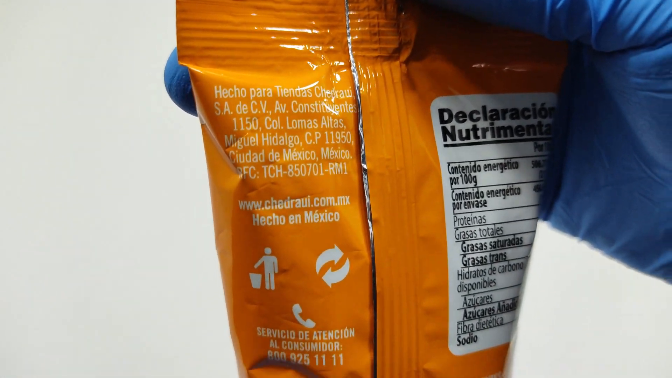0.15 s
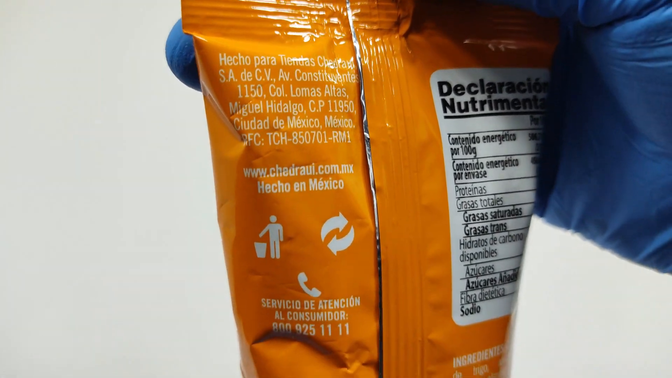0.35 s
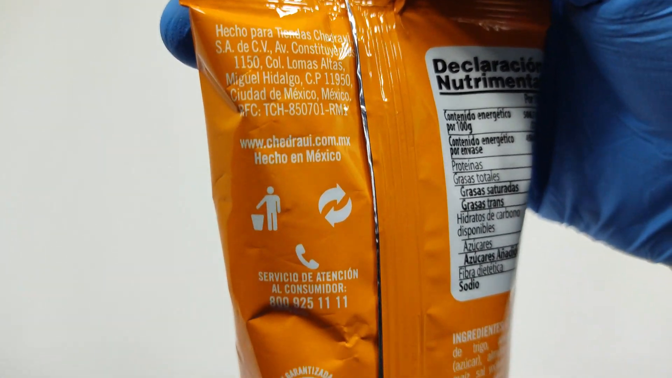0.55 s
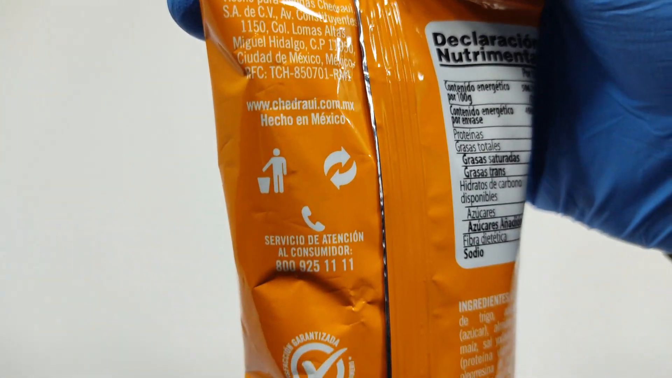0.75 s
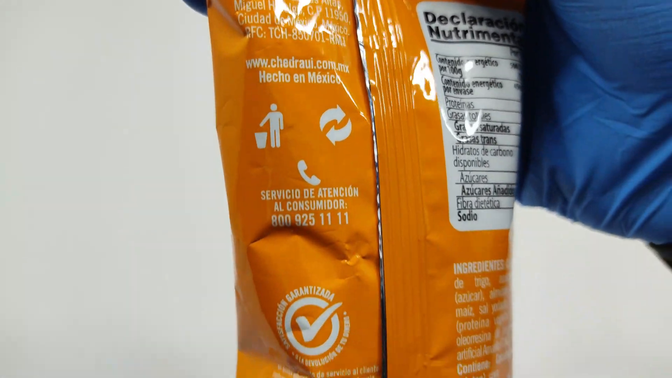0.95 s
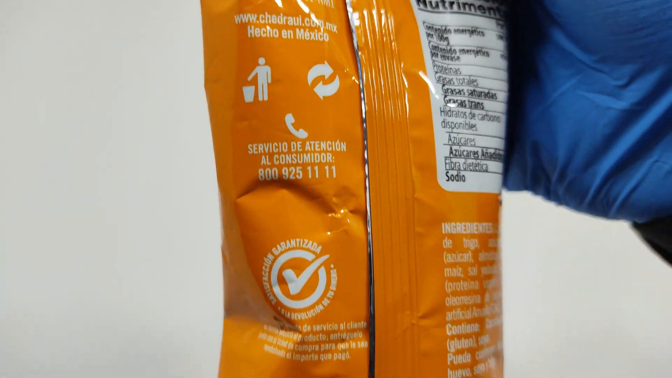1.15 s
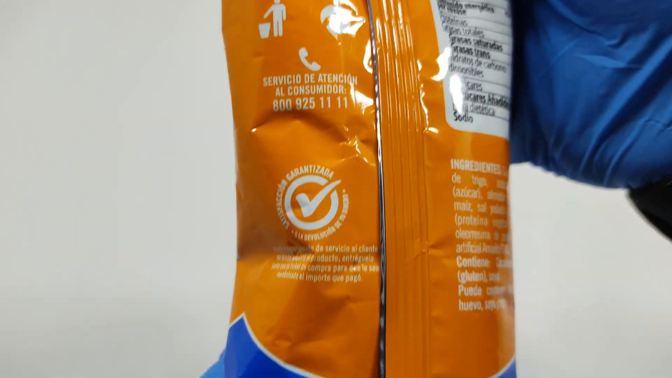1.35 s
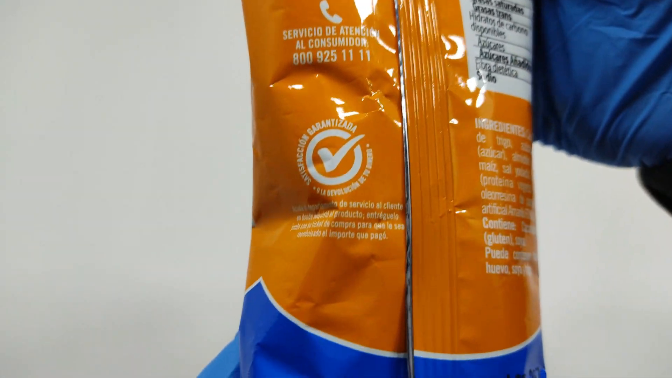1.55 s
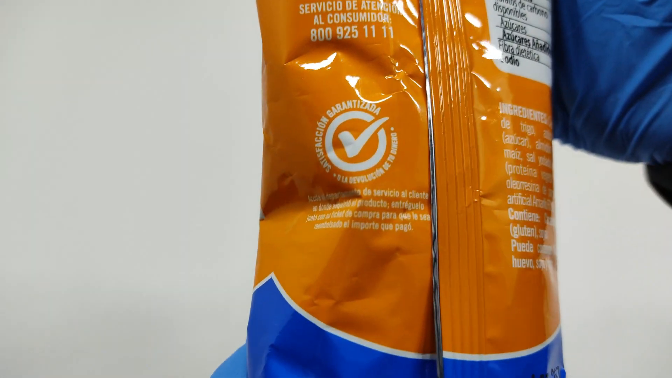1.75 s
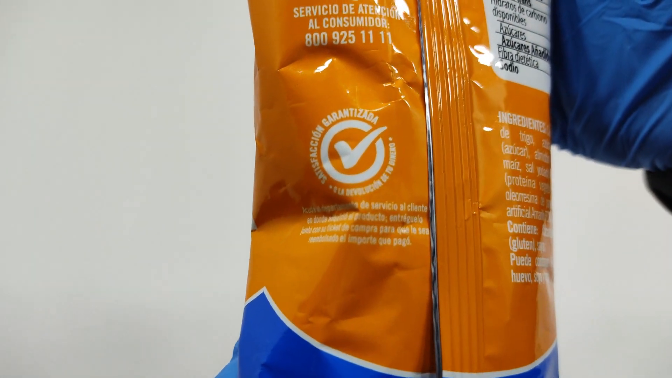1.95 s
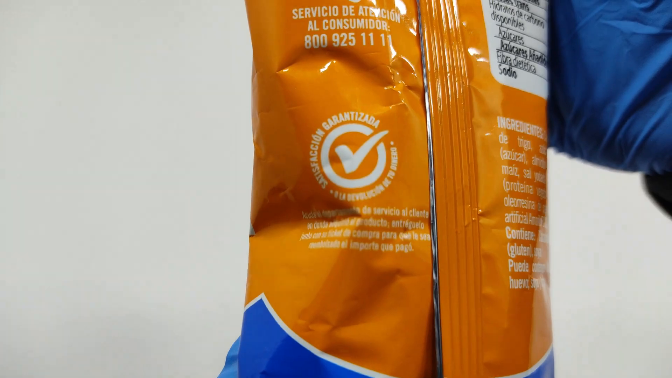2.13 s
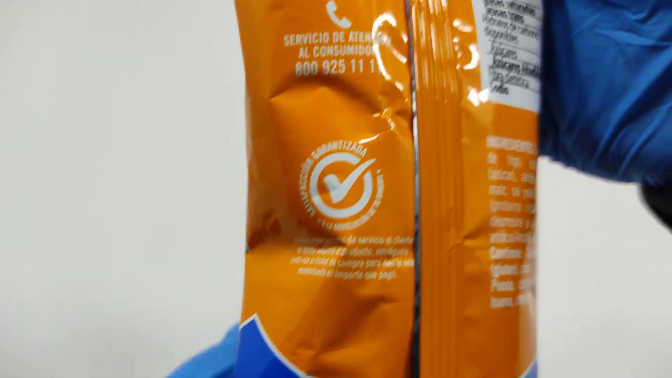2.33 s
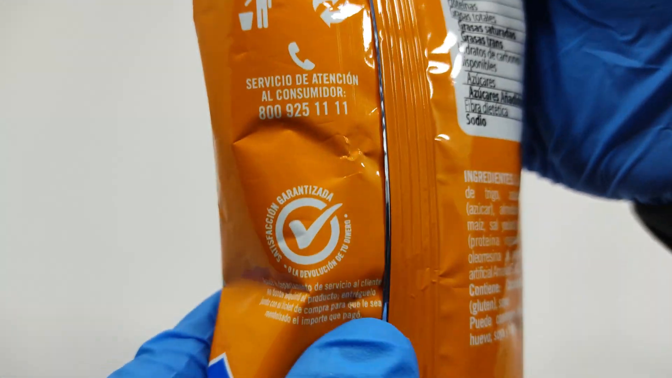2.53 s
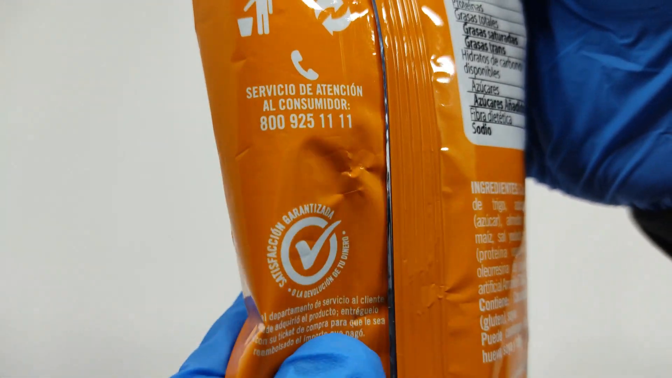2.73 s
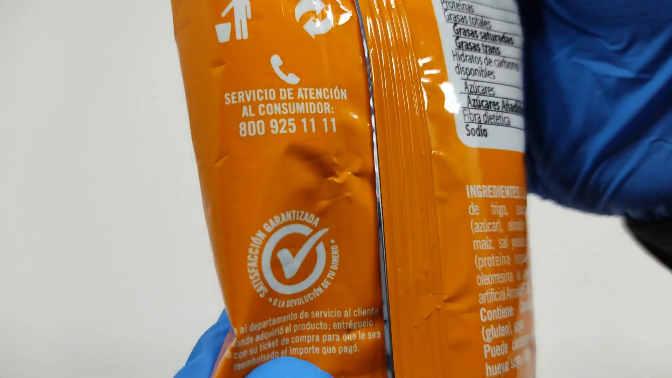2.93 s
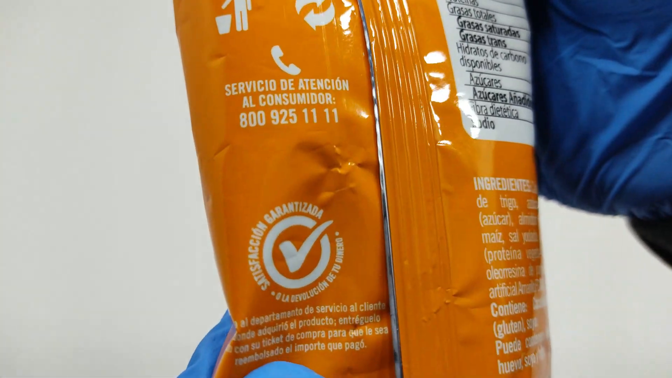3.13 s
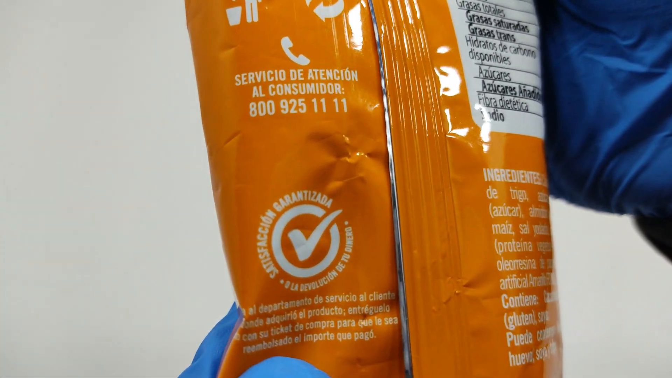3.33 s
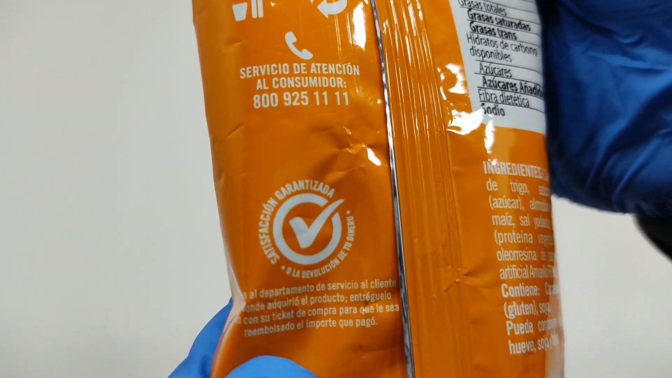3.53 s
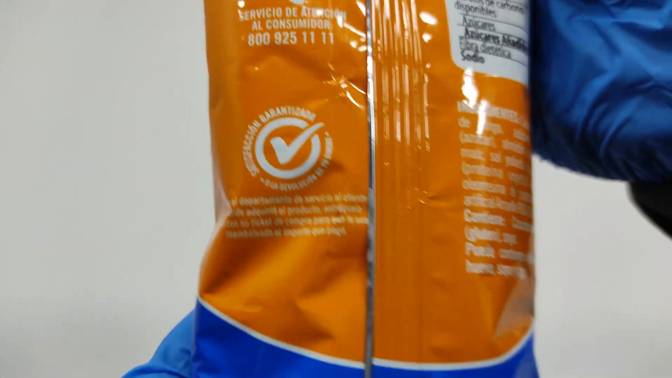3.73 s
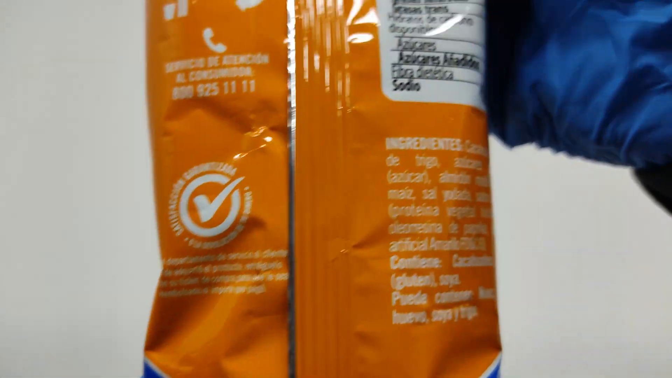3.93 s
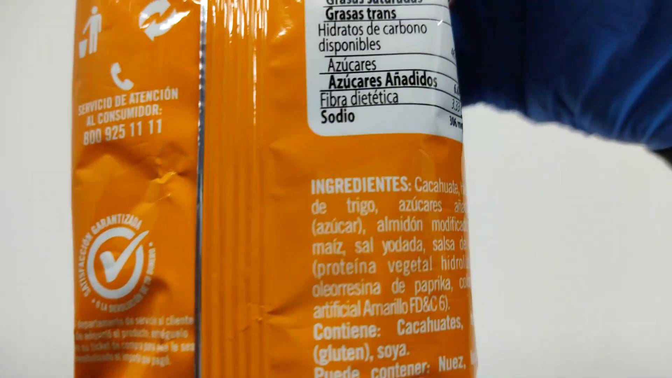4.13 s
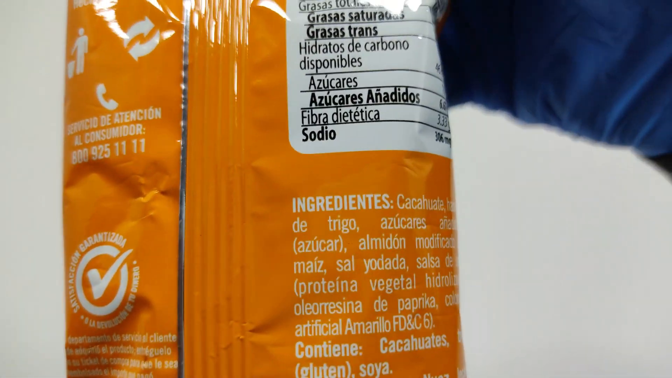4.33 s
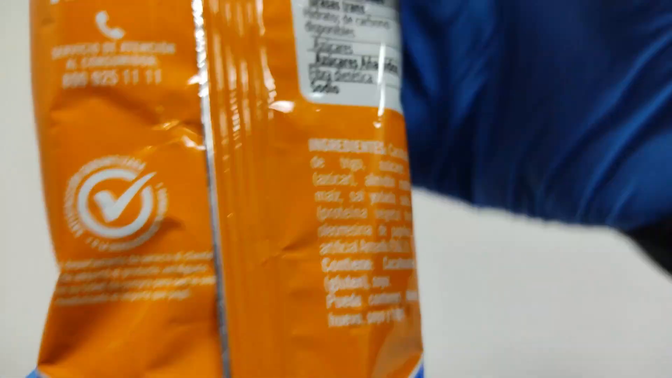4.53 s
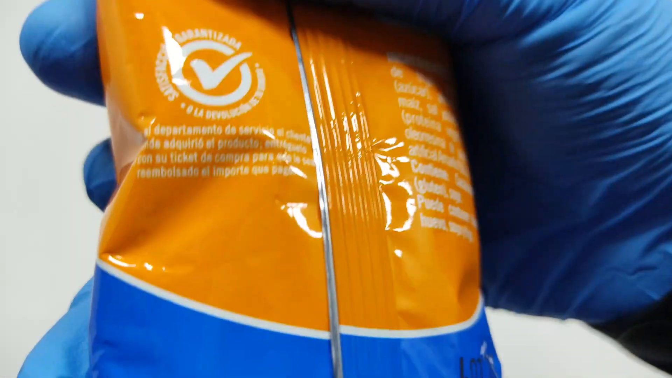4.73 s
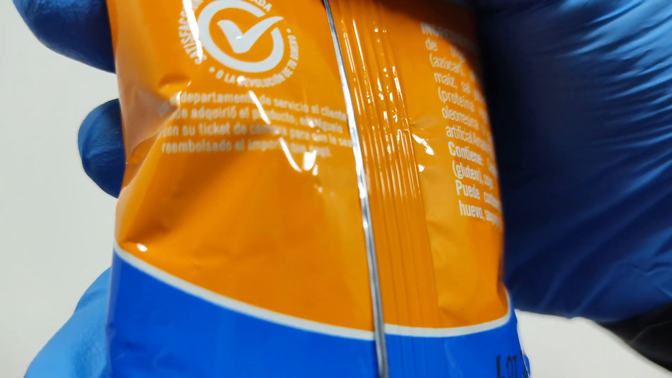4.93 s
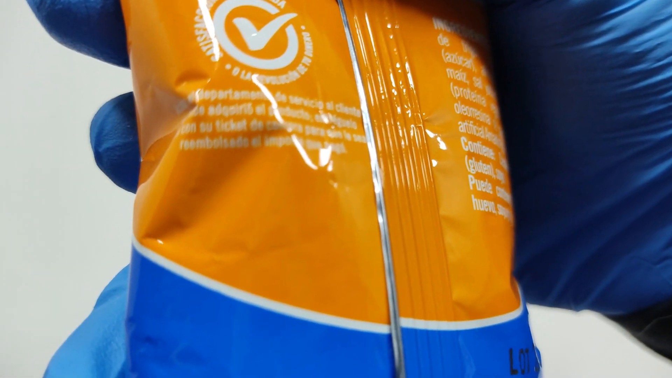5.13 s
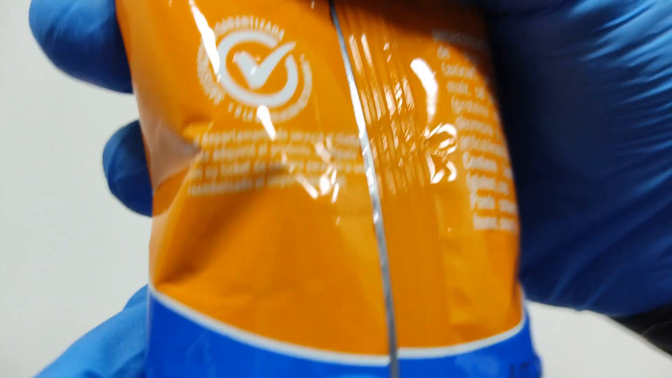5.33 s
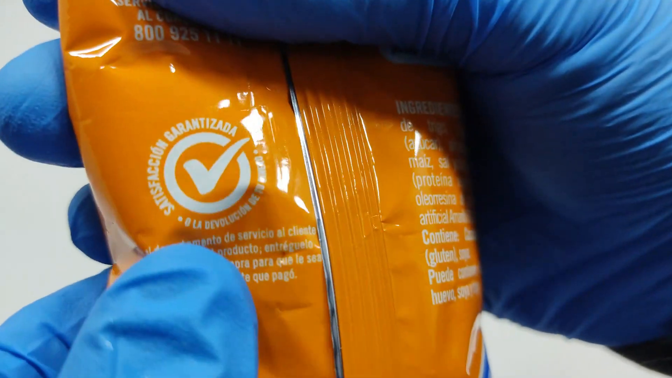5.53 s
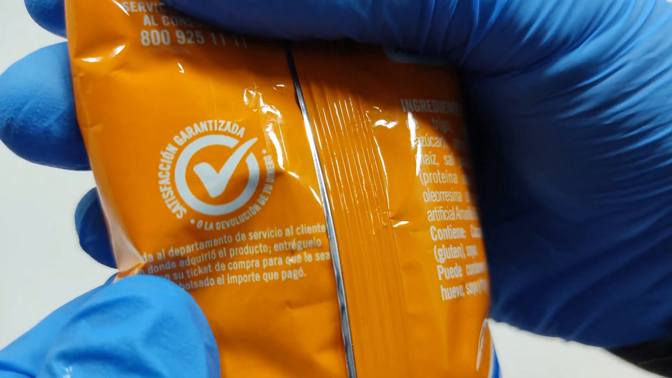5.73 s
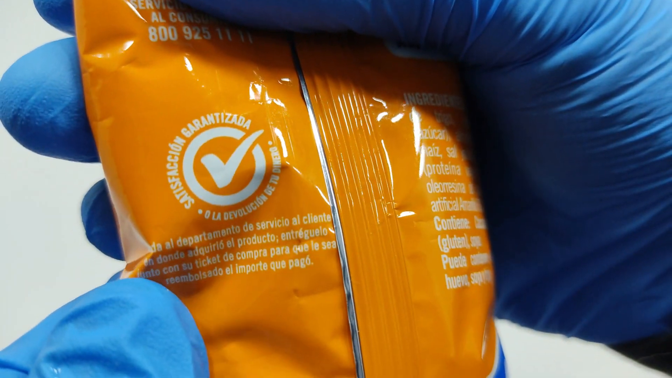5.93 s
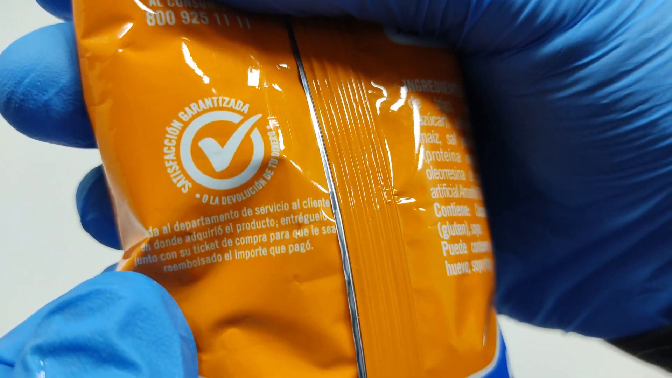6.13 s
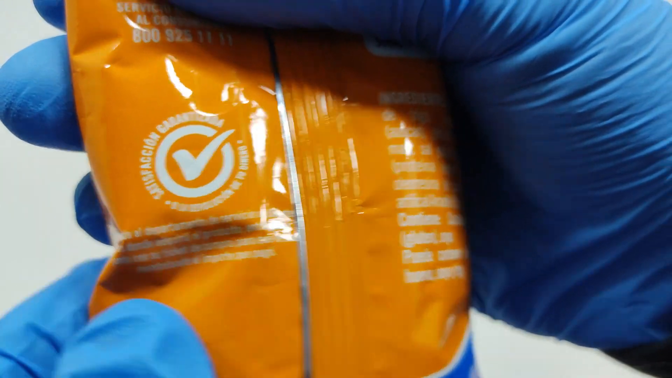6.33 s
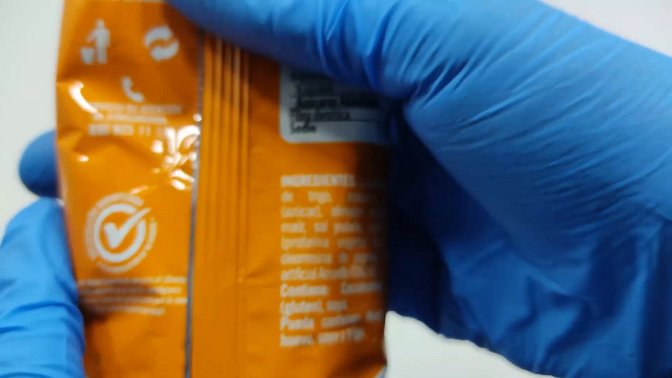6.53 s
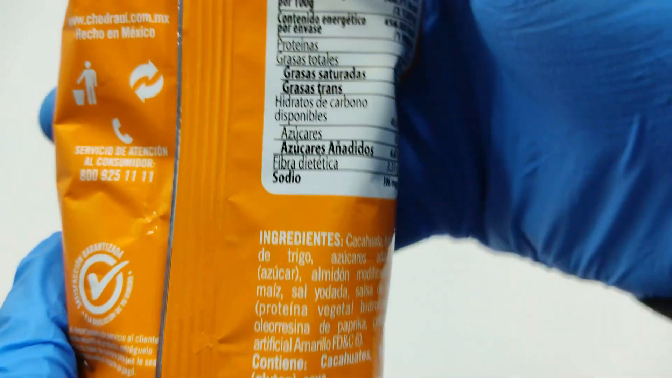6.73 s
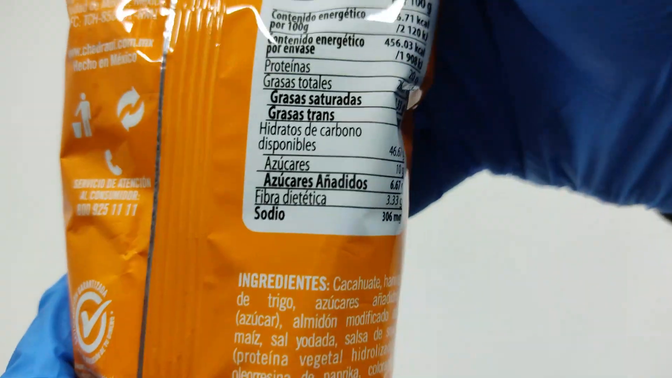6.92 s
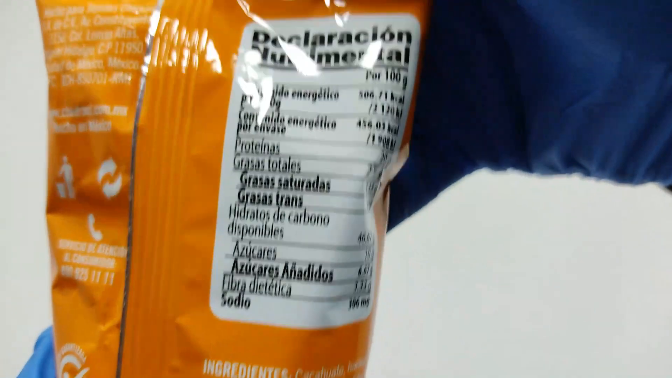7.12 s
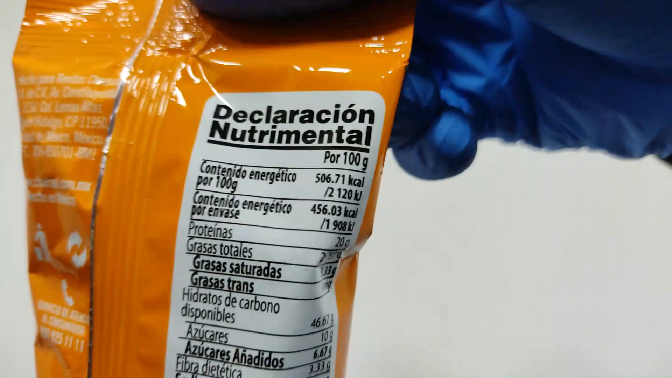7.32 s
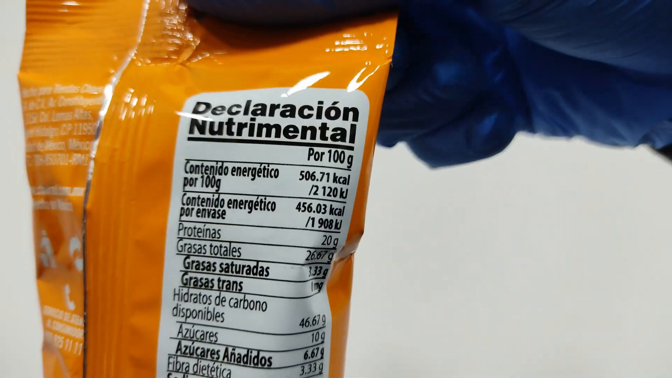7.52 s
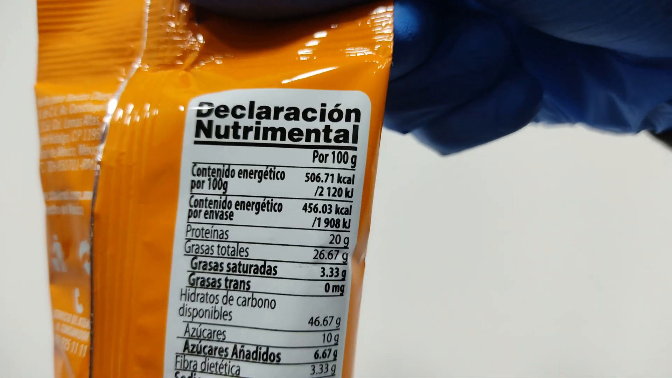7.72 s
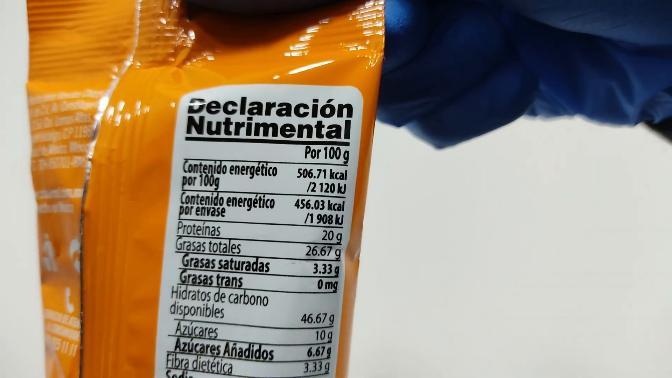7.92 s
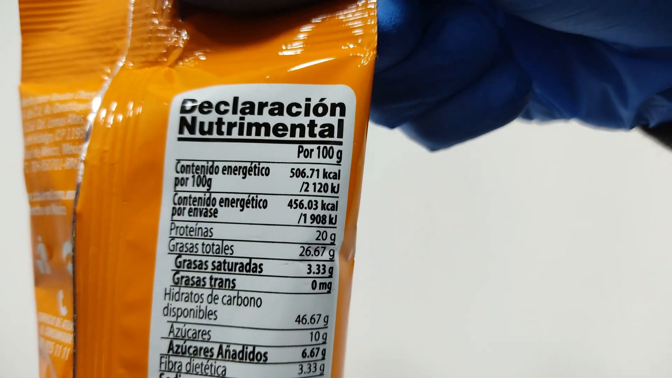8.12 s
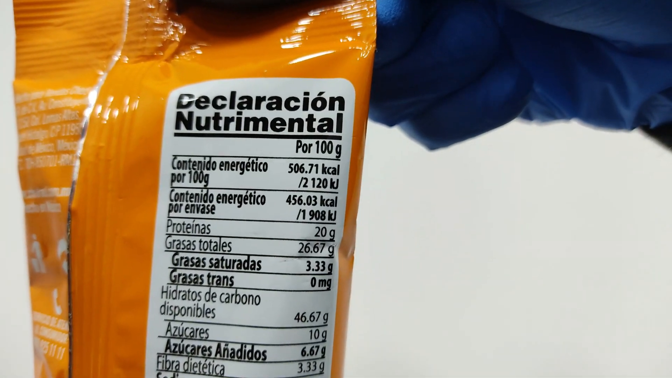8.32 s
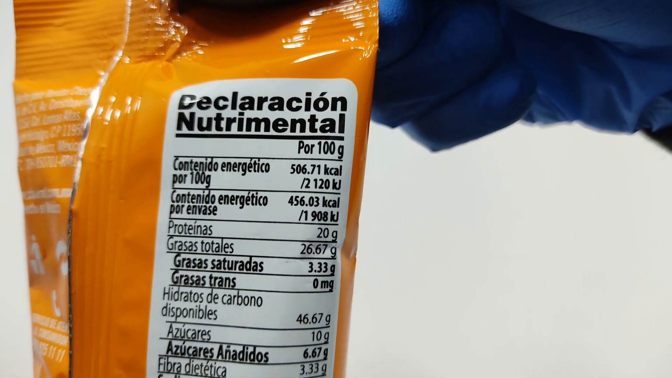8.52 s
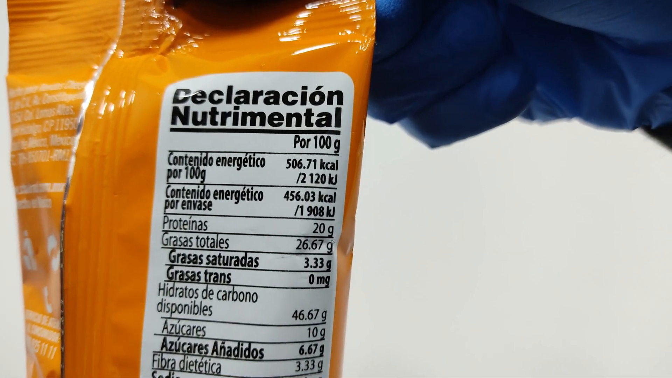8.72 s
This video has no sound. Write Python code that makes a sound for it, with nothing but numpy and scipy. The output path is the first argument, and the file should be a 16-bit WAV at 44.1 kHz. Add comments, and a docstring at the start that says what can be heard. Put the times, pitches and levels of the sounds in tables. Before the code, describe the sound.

A small foil-like snack packet is handled very close: bursts of dry snaps, soft crinkling and glove rub, with short pauses and fading clicks at the end.

```python
"""Snack bag squeezed by gloved hands

Gloved hands squeeze and turn a plastic snack bag close to a stereo microphone in a small room.
Creases buckle in short avalanches of tiny cracks: noise bursts, with a panel that pops and rings briefly.
The belly of the bag caves in with thuds: short tones that fall unsteadily in pitch.
Between the snaps, uneven noise grains and ringing pips make the soft crinkle and the rub of the gloves.
A dull palm rumble, a short room tail, a steady hush and a faint wavering whine lie beneath."""
import sys
import numpy as np
from scipy import signal
from scipy.fft import rfft, irfft, next_fast_len
from scipy.io import wavfile
from scipy.ndimage import uniform_filter1d

SR = 44100
rng = np.random.default_rng(int(sys.argv[2]) if len(sys.argv) > 2 else 0)


def int16_out(signal):
    """Quantize to a 16-bit WAV file."""
    q = np.round(np.clip(np.atleast_2d(signal).T, -1, 1) * 32767)
    wavfile.write(sys.argv[1], SR, q.astype(np.int16))


N = 386757  # samples


def amp(db):
    """Decibels to gain."""
    return 10 ** (np.asarray(db) / 20)


def unit(x):
    """Each row at rms 1."""
    return x / np.sqrt(np.mean(x ** 2, axis=-1, keepdims=True) + 1e-20)


def along(points, hz):
    """Values at hz from (Hz, value) points joined on a log frequency axis."""
    f, v = np.transpose(points)
    return np.interp(np.log(hz + 1), np.log(f), v)


def colour(points):
    """The frequency response that follows a (Hz, dB) spectrum."""
    return lambda hz: amp(along(points, hz))


def filtered(x, response):
    """x shaped by a response of frequency."""
    n = x.shape[-1]
    m = next_fast_len(n + n // 16, real=True)  # padded against wrap-around
    spectrum = rfft(x, m) * response(np.fft.rfftfreq(m, 1 / SR))
    return irfft(spectrum, m)[..., :n]


def wobble(rate):
    """A random curve with rate knots a second."""
    knots = rng.standard_normal(N // 32)
    return np.interp(np.arange(N) * rate / SR, np.arange(len(knots)), knots)


def sides(pan_db):
    """Left and right gains of constant power; positive pan_db leans left."""
    g = amp(np.array([pan_db, -pan_db]) / 2)
    return g / np.sqrt(np.mean(g ** 2, axis=0))


def placed(times, bursts):
    """Stereo bursts laid on the time line, each centred on its time."""
    size = bursts.shape[-1]
    where = np.round(times * SR).astype(int)[:, None] + np.arange(size) + size // 2
    return np.array([np.bincount(where.ravel(), b.ravel(), N + size)[size:N + size] for b in bursts])


def air():
    """The steady hush of the room, as coloured noise, and a faint whine that wavers in level."""
    # spectrum of the still room air: hz, relative level_db (per Hz)
    quiet = [(25, 2), (60, -9.5), (150, -13.5), (400, -16.5), (700, -41), (2000, -38), (5000, -45),
             (15000, -54)]
    whine_hz, whine_db = 1860, -90  # the level wavers around this
    whine_gain = amp(whine_db + 2 * wobble(18))
    whine = whine_gain * np.sin(2 * np.pi * whine_hz * np.arange(N) / SR)
    hush = unit(filtered(rng.standard_normal((2, N)), colour(quiet)))
    return amp(-71.5) * hush + whine


def room(x, wet_db, build, cross):
    """Near walls return a short dense tail that builds over build seconds, coloured by room resonances."""
    # decay time of the tail: hz, t60_s
    room_t60 = [(150, 0.24), (500, 0.13), (1800, 0.14), (8000, 0.15), (15000, 0.15)]
    # resonances that colour the tail: centre_hz, width_hz, boost_db
    room_modes = [(290, 35, 2), (564, 30, 5), (700, 60, 6), (920, 90, 2), (1170, 80, 2), (1800, 90, 5)]
    hz, t, z = signal.stft(rng.standard_normal((2, SR // 3)), SR, nperseg=256)
    decay = amp(-60 * t / along(room_t60, hz)[:, None])
    tail = signal.istft(z * decay, SR, nperseg=256)[1]
    tail *= 1 - np.exp(-(np.arange(tail.shape[1]) / SR / build) ** 2)
    tail = unit(tail) / np.sqrt(tail.shape[1])
    mixed = x + cross * x[::-1]  # each side hears reflections of the whole bag
    wet = signal.fftconvolve(mixed, tail, axes=1)[:, :N]

    def peaks(f):
        """Summed resonance boosts in dB."""
        return sum(db / (1 + (2 * (f - centre) / width) ** 2) for centre, width, db in room_modes)

    return filtered(wet, lambda f: amp(along(wet_db, f) + peaks(f)))


def effort(t):
    """Levels of rub, crinkle and drag in dB: the fingers grab, press to a peak, ease off and let go."""
    # squeezes, before each layer's own trim:
    # start_s, peak_s, end_s, rub_db, crinkle_db (over the rub), drag_db (over the rub)
    squeezes = [(0.288, .44, 0.7, -42.5, -8.5, -16), (0.869, 0.927, 1.044, -48, -2, -13.5),
                (1.274, 1.323, 1.46, -48.5, 2.5, -14.5), (1.72, 1.895, 2, -40.5, -1.5, -21.5),
                (2.036, 2.16, 2.24, -39, -4.5, -15.5), (2.366, 2.435, 2.56, -34.5, -4, -11.5),
                (2.597, 2.714, 2.93, -27, -9.5, -17.5), (3.0, 3.025, 3.14, -47.5, -16, -13),
                (3.132, 3.425, 3.55, -65, -21, 6), (3.568, 3.758, 3.92, -37.5, -4.5, -16.5),
                (3.931, 4.099, 4.23, -33.5, -6.5, -12), (4.284, 4.373, 4.44, -42, -3, -18.5),
                (4.503, 4.529, 4.68, -46, 0, -9.5), (4.663, 4.787, 4.987, -34, -2.5, -18),
                (5.361, 5.366, 5.456, -33.5, 0, -20.5), (5.486, 5.637, 5.77, -38.5, -1.5, -17.5),
                (6.413, 6.441, 8.3, -48.5, 0.5, -16), (6.509, 6.562, 6.94, -31, -4.5, -11.5),
                (6.908, 6.944, 7.05, -29.5, -11, -20.5), (7.116, 7.267, 7.45, -39.5, 0, -10.5),
                (7.585, 7.657, 7.88, -40, 0.5, -12.5), (7.89, 7.96, 7.95, -51.5, -3.5, -15),
                (8.15, 8.204, 8.2, -54.5, -4, -6.5)]
    # floor while the hands only hold the bag, before the same trims: rub_db, crinkle_db, drag_db
    rest_levels = [-79.5, -85, -81.5]
    ease_db = 7.5  # a squeeze is this much weaker at its ends than at its peak
    grab_db_per_s, release_db_per_s = 798.5, 261.5  # how fast a squeeze sets in and dies away
    start, peak, end, rub_db, crinkle_db, drag_db = np.transpose(squeezes)[..., None]
    slow = t[::64]  # a coarse time grid is enough for hand movement
    before_peak = (peak - slow) / np.maximum(peak - start, .005)
    after_peak = (slow - peak) / np.maximum(end - peak, .005)
    off_peak = np.maximum(before_peak, after_peak)
    force_db = rub_db - ease_db * np.minimum(off_peak, 1)
    force_db = force_db - grab_db_per_s * np.maximum(start - slow, 0)
    force_db = force_db - release_db_per_s * np.maximum(slow - end, 0)
    layers = force_db, force_db + crinkle_db, force_db + drag_db
    # the strongest squeeze at each moment wins
    return [np.interp(t, slow, np.maximum(db.max(axis=0), rest)) for db, rest in zip(layers, rest_levels)]


def drag():
    """A sliding palm stirs the air in the bag into a dull, uneven rumble."""
    # spectrum of the rumble: hz, relative level_db (per Hz)
    drag_spectrum = [(90, -30), (170, -9.5), (280, 1.5), (400, 3.5), (520, -8), (1200, -44.5)]
    *_, level_db = effort(np.arange(N) / SR)
    stir = rng.standard_normal((2, N)) * amp(6.3 * wobble(40))
    return amp(level_db) * unit(filtered(stir, colour(drag_spectrum)))


def folds(hz, count):
    """One random gain curve per fold, with peaks and gaps a few tenths of an octave wide."""
    fold_db = 3.6  # typical depth of the colouring, shallower in the high treble
    place = 5 * np.log2(1 + hz / 400)
    knots = rng.standard_normal((count, int(place.max()) + 2))
    ripple = np.array([np.interp(place, np.arange(len(k)), k) for k in knots])
    return amp(fold_db * ripple * np.interp(hz, [5000, 8000], [1, .3]))


def patchy(x, size=512):
    """Every few milliseconds another small fold takes over and lends its colour."""
    hz, t, z = signal.stft(x, SR, nperseg=size)
    return signal.istft(z * folds(hz, len(t)).T, SR, nperseg=size)[1][:, :N]


def pips(count=3000, size=600, pitch_hz=1000, spread=0.372, cycles=2.6, uneven_db=5.5):
    """Small facets of film flip at random, and each rings for a few cycles at its own pitch."""
    t = np.arange(size) / SR
    start = rng.integers(0, N, count)
    pitch, strength, pan = rng.standard_normal((count, 3)).T
    turns = (pitch_hz * np.exp(spread * pitch))[:, None] * t
    ring = amp(uneven_db * strength)[:, None] * (1 - np.exp(-turns)) * np.exp(-turns / cycles)
    phase = rng.random((2, count, 1))  # the two ports lie at different distances from each facet
    waves = ring * np.sin(2 * np.pi * (turns + phase)) * sides(pan_db=3.9 * pan)[..., None]
    where = (start[:, None] + np.arange(size)).ravel()
    return unit(np.array([np.bincount(where, w.ravel(), N + size)[:N] for w in waves]))


def handling():
    """Gloves drag on the film and countless small creases tick, in shared flurries."""
    # spectra of glove rub and fine crinkle: hz, relative level_db (per Hz)
    rub_spectrum = [(50, -36), (130, -27), (300, -7.5), (600, -3), (1050, 4.5), (2000, -2), (4000, -15.5),
                    (9000, -42)]
    crinkle_spectrum = [(800, -30.5), (2200, -11), (4500, -10), (6300, -5), (7900, 2.5), (9300, -5),
                        (11000, -25), (15500, -38.5)]
    rub_db, crinkle_db, _ = effort(np.arange(N) / SR)
    flurry = wobble(130)

    def grains(spectrum, flurry_db, own_db, spiky_db):
        """Tiny slips of very uneven size, coloured by the film."""
        slips, sizes = rng.standard_normal((2, 2, N))
        level_db = spiky_db * sizes + flurry_db * flurry + own_db * wobble(500)
        return unit(patchy(filtered(slips * amp(level_db), colour(spectrum))))

    rub = grains(rub_spectrum, flurry_db=4.5, own_db=1.0, spiky_db=3.0) + amp(-4) * pips()
    rub = rub * amp(rub_db - 4.5)
    crinkle = grains(crinkle_spectrum, flurry_db=4.5, own_db=2, spiky_db=4.5) * amp(crinkle_db - 1.5)
    # the smallest facets tick, each at its own high pitch
    ticks = pips(count=900, size=300, pitch_hz=3620, spread=.36, cycles=8.0, uneven_db=3.5)
    ticks = ticks * amp(crinkle_db - 12.5)
    return ticks + rub * sides(pan_db=0.0)[:, None] + crinkle * sides(pan_db=-8.0)[:, None]


def ringing(t, turns, rise, fall):
    """A tone that swells and dies around t = 0 and meets the two ports in different phases."""
    swell = np.exp(np.where(t < 0, -(t / rise) ** 2, -t / fall))
    swell = swell * signal.windows.tukey(len(t), .5 ** 2)
    return swell * np.sin(2 * np.pi * (turns + rng.random((2, len(turns), 1))))


def thuds(size=3000):
    """The belly of the bag caves in under a finger with a short thud that falls in pitch."""
    # cave-ins: centre_s, level_db, pitch_hz (around which it sags)
    cave_ins = [(.574, -39, 376), (0.863, -39.5, 352), (.955, -30.5, 460), (1.303, -40.5, 379),
                (2.471, -31, 299), (2.607, -36.5, 314), (2.681, -35, 406), (3.357, -57, 331),
                (3.464, -51, 290), (3.788, -33.5, 363), (3.838, -38, 384.5), (3.985, -42, 270),
                (4.068, -39, 248), (4.159, -32, 289), (4.33, -30, 195), (4.632, -42, 302),
                (4.72, -35.5, 278.7), (4.768, -31, 230), (4.799, -32.5, 246), (5.397, -40, 327.4),
                (6.562, -25.5, 288), (6.644, -28, 291), (6.685, -36, 327), (6.757, -34.5, 251),
                (6.857, -33, 162), (6.939, -33, 241), (6.994, -34, 408.5), (7.201, -21.5, 364.4),
                (7.282, -26, 220.5), (7.468, -37, 291), (7.598, -38, 300), (7.748, -26, 256.7),
                (7.805, -31, 242), (8.219, -36, 250), (8.636, -31, 317), (8.75, -28, 302)]
    bag_low_hz = 124  # so small a bag radiates little below this
    rise_cycles, fall_cycles = 2.4, 2.3  # deeper thuds last longer
    sag_octaves_per_s, rough = 22, .18  # mean fall as the film slackens, and its unsteadiness
    s, db, pitch_hz = np.transpose(cave_ins)
    pitch_hz = pitch_hz[:, None]
    t = (np.arange(size) - size // 2) / SR
    sag = sag_octaves_per_s * (.5 + rng.random((len(s), 1)))
    # the film gives way unevenly, and the finger soon damps it
    jolts = unit(uniform_filter1d(rng.standard_normal((len(s), size)), size=120))
    turns = pitch_hz * np.cumsum(2 ** (-sag * t) * (1 + rough * jolts), axis=1) / SR
    tone = ringing(t, turns, rise_cycles / pitch_hz, fall_cycles / pitch_hz)
    knocks = placed(s, tone * amp(db)[:, None])
    knocks = filtered(knocks, lambda hz: 1 - np.exp(-(hz / bag_low_hz) ** 4))
    return knocks * sides(pan_db=-3.5)[:, None]


def snaps(size=2880):
    """Each crease gives way in an avalanche of cracks that swells and dies in a few milliseconds."""
    # buckling creases: centre_s, panel_db, sharpness_db (sizzle over panel), pitch_hz,
    # pan_db (left over right, before each layer's own scaling and offset)
    creases = [(.354, -54.5, 8.5, 1090, 4), (.4954, -43, -2.5, 1640, -10), (0.5709, -36, 8, 2100, 6),
               (.709, -48.5, 3, 970, 1.5), (0.792, -55.5, 9, 1140, -9), (0.8607, -31, 9.5, 2200, -1.5),
               (.928, -44, -15, 1000, 3), (0.95, -23, 3.5, 1090, 2), (1.259, -61.5, 13.5, 1210, -4.5),
               (1.301, -32.5, 4, 880, -6), (1.411, -43.5, -19, 784, -5), (1.4478, -45.5, 12, 1080, -4),
               (1.52, -64, 13.5, 1090, 5), (1.598, -58, 6.5, 1200, 0), (1.6334, -59, 6, 1160, -11),
               (1.6788, -45.5, 7.5, 910, -1), (1.748, -46.5, -2, 900, 2), (1.8169, -36.5, 5, 526, 5),
               (1.9135, -34.5, 8, 1330, -3), (1.9303, -38, 10, 920, 5), (2.031, -41.5, 9, 1480, -3.5),
               (2.064, -31.5, 10.5, 1370, -4), (2.0912, -33, 14.5, 2170, -3), (2.1408, -26.5, 9, 930, -3),
               (2.2228, -44, 6, 840, -0.5), (2.2847, -33.5, -17.5, 864, 3), (2.466, -21, 6, 1140, 3),
               (2.5975, -24.5, -0.5, 1525, -2), (2.6114, -24, 4.5, 880, -2), (2.669, -26.5, 2, 910, -6),
               (2.6849, -19, -5.5, 940, 0), (2.7434, -20, -17.5, 950, -8), (2.7771, -19.5, -7, 1380, -1),
               (2.825, -25.5, -7.5, 1170, 2), (2.854, -33, 0.5, 1140, -2), (2.905, -29.5, -1.5, 1370, -3),
               (2.9284, -29.5, -19, 990, 3.5), (2.9486, -23.5, -19.5, 930, 7.5),
               (2.9617, -24, -14.5, 1210, 1), (3.0572, -38, -12.5, 1205, -9),
               (3.102, -48.5, -7.5, 1210, -13), (3.313, -35.5, -24.5, 1105, -13.5),
               (3.345, -47, -26, 768, 0.5), (3.6833, -17, -9.5, 1330, -6.5), (3.7853, -21, 9, 1100, -5),
               (3.795, -29, -1, 1120, -7), (3.8137, -30.5, 7, 1410, -2), (3.8338, -25, 4.5, 620, -6),
               (3.9252, -44.5, 10.5, 1150, -7.5), (3.9747, -35.5, -6.5, 1800, -6),
               (4.0875, -27, -1, 1690, -7.5), (4.1574, -28, 0.5, 1730, -6), (4.291, -38, -15, 2320, -8),
               (4.3229, -18.5, 0.5, 1167, -1), (4.4554, -37.5, -8, 677, -15), (4.522, -41.5, -10, 1120, -7),
               (4.628, -33, -6, 1750, -3.5), (4.7134, -31, -14, 1790, -6), (4.748, -33, -18, 1300, -4),
               (4.7715, -21, .5, 780, -5), (4.7867, -20, 7, 1750, 1), (4.8603, -25, 3.5, 1670, -1),
               (4.89, -31, 1.5, 1540, -9), (4.9614, -34.5, -0.5, 1330, -0.5), (5.165, -56, -16, 1100, -5),
               (5.1999, -49.5, -6.5, 1320, -17), (5.2268, -50, -18, 600, -11), (5.394, -25, 4, 2360, -5),
               (5.4039, -30, 9.5, 1210, -5), (5.4224, -37.5, 8, 1330, -8), (5.481, -29, 2, 1185, -11),
               (5.59, -29, 4.5, 850, -11), (5.6208, -29, 6.5, 1590, -7), (5.6697, -33.5, 4.5, 980, -18),
               (5.71, -32, 15.5, 944, -14), (5.7862, -36.5, 11.5, 767, -7.5), (5.852, -56.5, -2, 1240, -3),
               (5.909, -52.5, -31, 1194, 2.5), (5.932, -54, -21.5, 1266, 2.5), (6.055, -43, -48, 1100, 8),
               (6.2104, -50, -11.5, 1580, -12), (6.2712, -33.5, 8.5, 1175, -3),
               (6.4061, -28.5, -7, 1360, -10.5), (6.4386, -41, 8, 1180, -9), (6.5318, -27, 5, 960, -1.5),
               (6.5526, -24, 10, 2000, -4), (6.592, -29, 10, 1360, -2.5), (6.6214, -25, -6.5, 1190, -9),
               (6.684, -38, -10, 1240, -4), (6.75, -25, 10, 1620, -6), (6.778, -27.5, -13, 1370, -5),
               (6.8361, -24.5, 4, 1130, -3), (6.9135, -34.5, 3.5, 1330, -19), (6.9354, -21.5, 1.5, 1160, 4),
               (6.9626, -30.5, 0, 1080, -2), (7.0115, -23, 0.5, 1310, -1.5),
               (7.1319, -33.5, -18, 1290, -4.5), (7.1932, -21, -3, 1295, -3.5),
               (7.2789, -27.5, -7.5, 743, -1), (7.4027, -22.5, -4.5, 1124, -7), (7.432, -31, -8, 1368, -8),
               (7.4808, -34.5, -15, 1180, 3), (7.5947, -25, -9, 565.4, -13), (7.6501, -24.5, 5.5, 1780, -5),
               (7.729, -25, 9.5, 1240, 2), (7.746, -15.5, -4, 900, -1), (7.7999, -23, 4, 1540, -1.5),
               (7.932, -49.5, 5, 900, -6), (7.9877, -48.5, 0, 1510, -8), (8.027, -52.5, -11, 800, -4),
               (8.117, -57, 0, 1290, -8), (8.1612, -35.5, -14, 1305, -3), (8.2143, -36.5, -20, 1400, -15),
               (8.227, -39, -18, 1730, -6), (8.252, -32.5, 3, 1000, -3), (8.3416, -53, -35.5, 1140, 8),
               (8.36, -57, -25, 1200, 3.5), (8.6347, -31.5, -7.5, 843, -4.5),
               (8.746, -29.5, -2.5, 1158, -6.5)]
    # what a snap radiates, from the whole bag to the sharpest kinks: hz, relative level_db (per Hz)
    thump_spectrum = [(40, -36), (90, -33.5), (160, -14), (290, 7), (480, 3.5), (750, -14.5), (1500, -63)]
    panel_spectrum = [(200, -48), (450, -11), (650, -1.5), (1150, 0), (1900, -2.5), (2800, -21.5),
                      (6000, -80)]
    crack_spectrum = [(1000, -46), (1900, -1.5), (2400, 1), (4000, -4), (5300, -4.5), (7000, -12),
                      (11000, -64.5)]
    sizzle_left = [(3000, -44), (5500, -15), (7300, -13.5), (8900, 2.5), (10000, -11), (11500, -22),
                   (15500, -36)]
    sizzle_right = [(3000, -44.5), (5500, -14.5), (6800, -7), (7800, 0), (9200, -15.5), (11000, -29.5),
                    (15500, -42)]
    # ringing of a flipped panel: multiple of its pitch (ratio), level_db (against the snap)
    panel_modes = [(.7, -9.5), (1, -2), (1.53, -9)]
    # smaller, higher panels than the usual one crack more and sound brighter all over
    usual_panel_hz, crack_db_per_octave, panel_shift = 1260, 2, 0.091
    crack_over_panel_db, crack_per_sharp = -2.5, 0.45  # dB gained per dB of sharpness
    # softer folds lose treble (dB an octave per dB) and give a dull tock
    soft_below_db, grit_per_sharp, grit_hz = -12, .5, 1300
    body_db = -18.5  # the air in the bag answers every snap this much more weakly

    s, panel_db, sharpness_db, pitch_hz, pan_db = np.transpose(creases)
    # a sharp kink cracks and sizzles, a soft fold only pops
    sizzle_db = panel_db + sharpness_db
    grit_db = grit_per_sharp * np.minimum(sharpness_db - soft_below_db, 0)
    crack_db = panel_db + crack_over_panel_db + crack_per_sharp * sharpness_db
    crack_db = crack_db + crack_db_per_octave * np.log2(pitch_hz / usual_panel_hz) + grit_db / 2
    t = (np.arange(size) - size // 2) / SR
    # the cracks come in clumps, heard alike on both sides
    clumps = unit(uniform_filter1d(rng.standard_normal((len(s), size)), size=28))

    def avalanche(response, lag, rise, fall, clump_db, spiky_db, skirt_db=-14, lead=0.013, trail=0.025):
        """One stereo burst per snap (times in s), in the colour of its own fold, rms 1 over its core."""
        u = t - lag
        core = np.exp(-np.where(u < 0, u / rise, u / fall) ** 2)
        skirt = amp(skirt_db) * np.exp(np.where(u < 0, u / lead, -u / trail))
        swell = (core + skirt) * signal.windows.tukey(size, .5 ** 2)
        cracks, sizes = rng.standard_normal((2, 2, len(s), size))
        burst = cracks * amp(spiky_db * sizes + clump_db * clumps) * swell
        burst = filtered(burst, lambda hz: response(hz) * folds(hz, len(s)))
        return unit(burst) * np.sqrt(0.0095 * SR / size)  # a core of 9.5 ms

    def panel(hz):
        """The pop of the flipping panel is strongest around its own pitch."""
        detune = hz / pitch_hz[:, None] - pitch_hz[:, None] / (hz + 1)
        # a flip without cracking rings most clearly
        ring = 0.58 * np.minimum(amp(panel_db - crack_db), 2)[:, None]
        dull_db = grit_db[:, None] * np.log2(np.maximum(hz / grit_hz, 1))
        shifted_hz = hz * (usual_panel_hz / pitch_hz[:, None]) ** panel_shift
        return amp(dull_db + along(panel_spectrum, shifted_hz)) * (1 + ring / (1 + 5j * detune))

    def sizzle(hz):
        """The treble peaks a little higher on the left than on the right."""
        # louder sizzles are brighter at the very top, quieter ones duller
        top_db = 0.38 * (sizzle_db[:, None] + 23) * np.interp(hz, [9000, 12000], [0, 1])
        return amp(top_db + np.array([[along(sizzle_left, hz)], [along(sizzle_right, hz)]]))

    modes = sum(amp(db) * ringing(t, ratio * pitch_hz[:, None] * t, rise=0.0033, fall=.0035)
                for ratio, db in panel_modes)
    # bending waves in film are dispersive: the treble arrives first, the thump last
    thump = avalanche(colour(thump_spectrum), lag=0.0023, rise=0.0023, fall=0.0043, clump_db=0, spiky_db=4.5)
    # pop and sizzle fall fast: the avalanche stops short once the panel has flipped
    pop = avalanche(panel, lag=0.0011, rise=0.005, fall=.004, clump_db=0.0, spiky_db=6.0)
    crack = avalanche(colour(crack_spectrum), lag=0, rise=0.0051, fall=0.0039, clump_db=1.5, spiky_db=6.5)
    hiss = avalanche(sizzle, lag=0, rise=0.0049, fall=.0042, clump_db=-1.0, spiky_db=4.0)
    layers = [(thump, panel_db + body_db, pan_db),
              (modes + amp(-1) * pop, panel_db, 0.33 * pan_db),
              (crack, crack_db, 0.55 * pan_db - 3.5),
              (hiss, sizzle_db, 0.68 * pan_db - 6)]
    return placed(s, sum(burst * (amp(db) * sides(pan))[..., None] for burst, db, pan in layers))


def scene():
    """The bag, its reflections and the still air."""
    bag = snaps() + thuds() + handling() + drag()
    # reflected level before the resonances: (hz, level_db)
    wet_db = [(150, -17.0), (400, -6.5), (1200, -11.5), (3500, -8.5), (8000, -12.5), (14000, -8.0)]
    return bag + room(bag, wet_db, build=0.0058, cross=0.47) + air()


def record(dry):
    """The recorder clips at full scale and then keeps nothing above its band limit."""
    top_hz = 15900
    return filtered(np.clip(dry, -1, 1), lambda hz: hz < top_hz)


dry = scene()
out = record(dry)
int16_out(out)
```